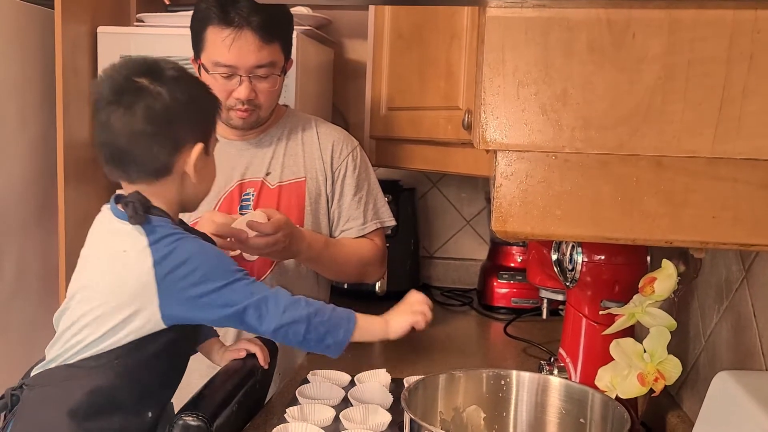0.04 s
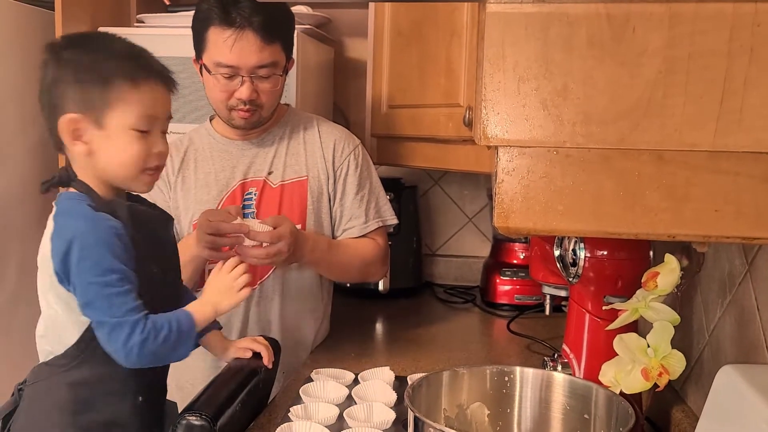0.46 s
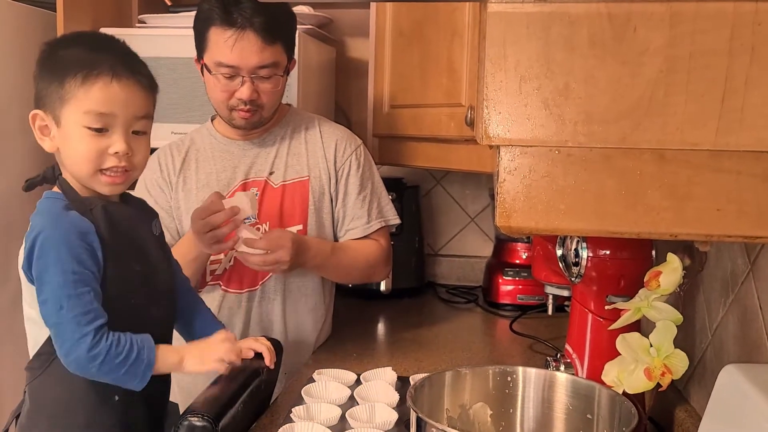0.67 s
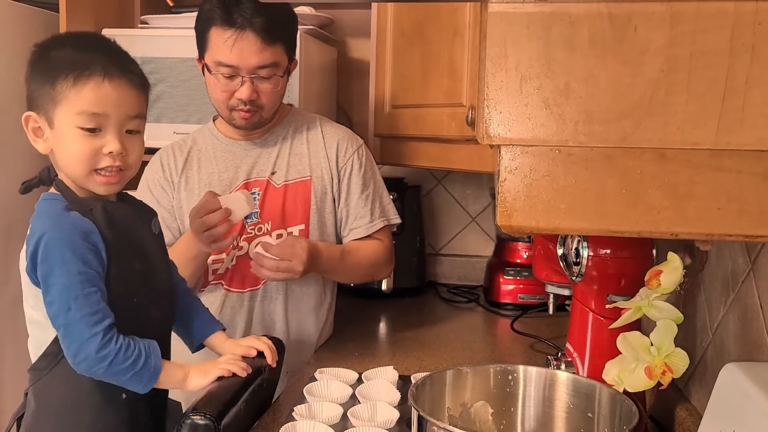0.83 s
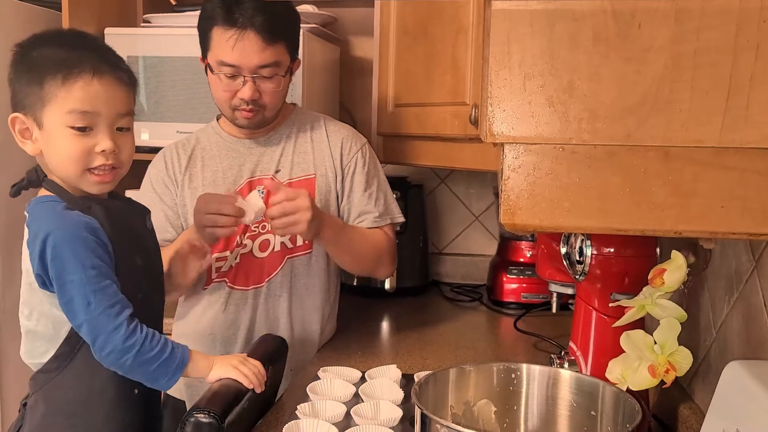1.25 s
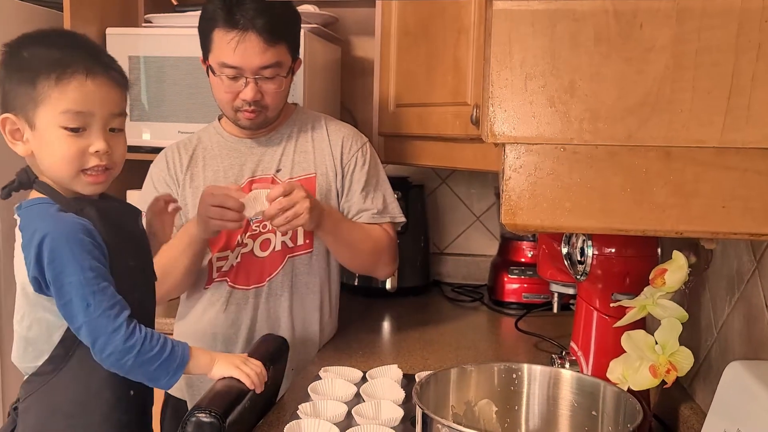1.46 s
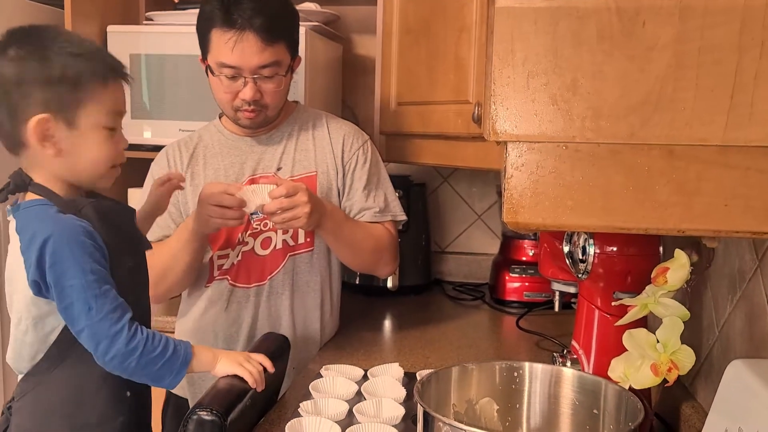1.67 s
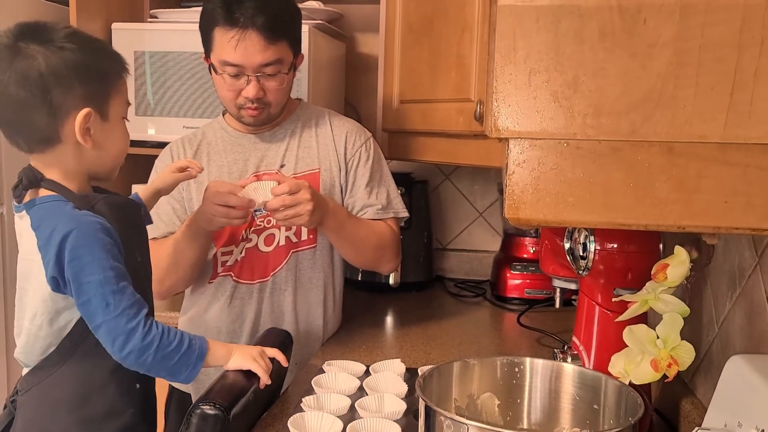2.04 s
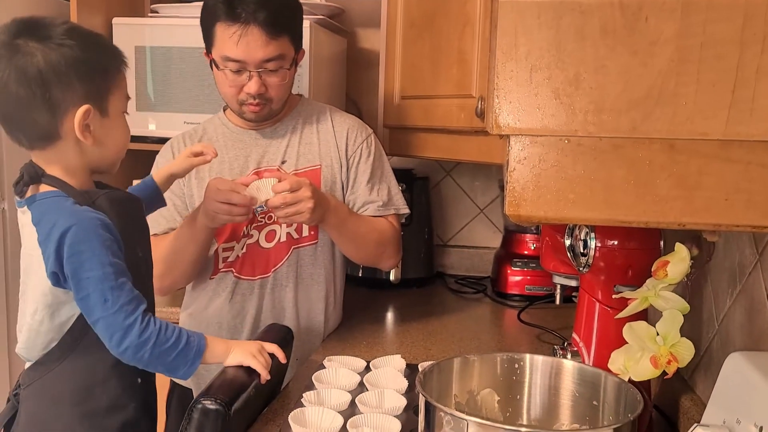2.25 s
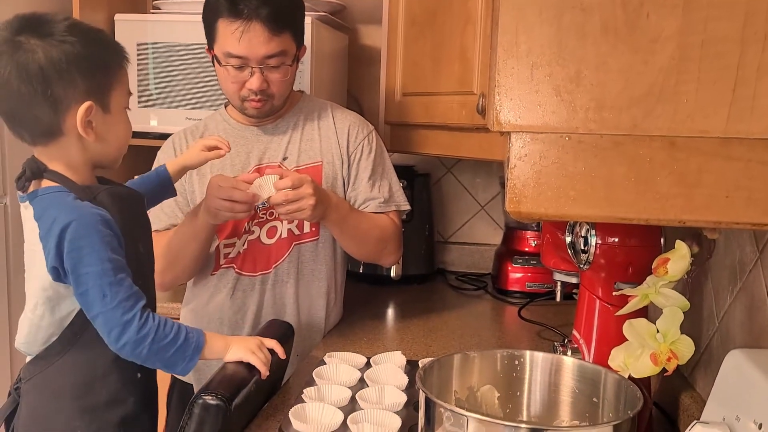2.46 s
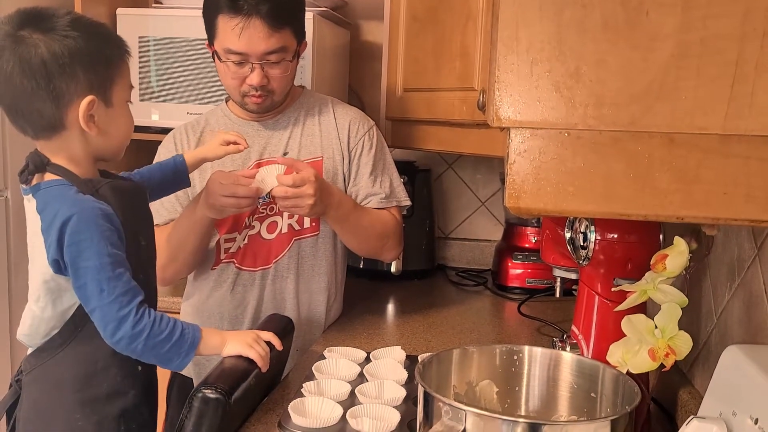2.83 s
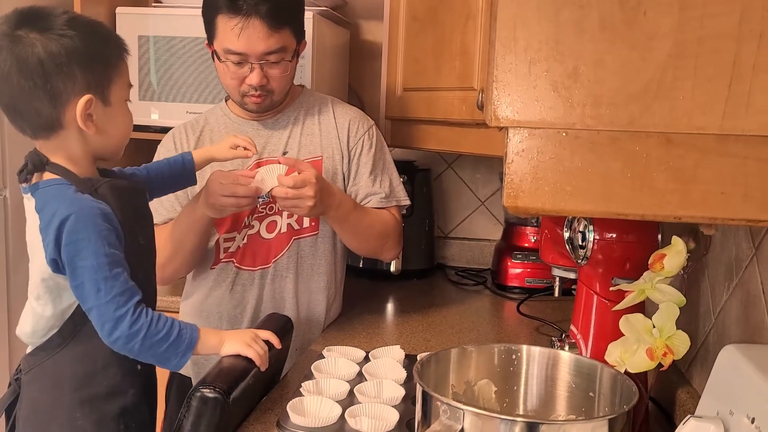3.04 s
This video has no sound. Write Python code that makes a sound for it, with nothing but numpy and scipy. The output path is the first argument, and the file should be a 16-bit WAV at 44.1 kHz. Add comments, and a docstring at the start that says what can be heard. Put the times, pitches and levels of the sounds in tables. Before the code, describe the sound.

Paper baking cups crackle as fingers pull one off the stack with a brief bright swish. More crinkling follows, fades to faint ticks and briefly returns. The microphone is close by in a small kitchen with a humming appliance.

```python
"""Thin paper baking cups are peeled apart by hand in a small kitchen, about a metre away.
Stick-slip friction between the pleats makes a dense stream of tiny clicks that shake the paper wall;
now and then a crease buckles and rings the cup. One cup slides off the stack with a bright swell,
and fingers bump and drag on the paper. Reflections from cupboards and walls smear these sounds,
while an appliance hums steadily over the low rumble of the room."""
import sys
import numpy as np
from scipy import signal
from scipy.fft import rfft, irfft
from scipy.io import wavfile
from scipy.ndimage import uniform_filter1d

SR = 44100
rng = np.random.default_rng(int(sys.argv[2]) if len(sys.argv) > 2 else 0)


def materialize(psi):
    """Save the field psi as 16-bit PCM at rate SR to the path in sys.argv[1].

    A 1-D psi becomes a single channel; in a 2-D psi each row is a channel.
    """
    bounded = np.clip(np.atleast_2d(psi).T, -1, 1)
    quanta = np.round(bounded * 32767).astype(np.int16)
    wavfile.write(sys.argv[1], SR, quanta)


N = 141120
TIME = np.arange(N) / SR


def undb(db):
    """Decibels to amplitude ratio."""
    return 10 ** (np.asarray(db) / 20)


def unit(x):
    """Normalisation to rms 1."""
    return x / np.sqrt(np.mean(x ** 2))


def pan(db):
    """Interaural level difference: two gains, the left db above the right."""
    return undb(np.array([[db], [-db]]) / 2)


def colour(x, spectrum):
    """Spectral shaping by (frequency [Hz], gain [dB]) points, at rms 1."""
    hz, db = np.array(spectrum, float).T
    f = np.maximum(np.fft.rfftfreq(x.shape[-1], 1 / SR), 1)
    gain = undb(np.interp(np.log(f), np.log(hz), db))
    return unit(irfft(rfft(x) * gain, x.shape[-1]))


def resonate(x, hz, width_hz):
    """Resonance: one peak, width_hz wide at 6 dB down, at rms 1."""
    f = np.fft.rfftfreq(x.shape[-1], 1 / SR)
    return unit(irfft(rfft(x) / (1 + (2 * (f - hz) / width_hz) ** 2), x.shape[-1]))


def drift(per_s):
    """Random modulation: twice-averaged noise, at rms 1."""
    span = max(int(SR / per_s), 1)
    smooth = uniform_filter1d(rng.standard_normal(N), span, mode="wrap")
    return unit(uniform_filter1d(smooth, span, mode="wrap"))


# Course of the friction: (time [s], relative hiss level [dB], relative wall level [dB])
FRICTION_LEVELS = [(0, -44.5, -51.5), (0.081, -38, -41), (0.15, -46, -49.5), (0.192, -44, -41.5),
                   (0.27, -46.5, -47), (0.33, -40, -43.5), (0.395, -49, -42), (0.435, -26, -27),
                   (0.47, -34, -39), (0.51, -28, -30.5), (0.54, -27, -43), (0.575, -33, -31),
                   (0.605, -34, -37), (0.635, -30.5, -37), (0.69, -48, -52.5), (0.755, -50.5, -55),
                   (0.8, -35, -46.5), (0.85, -56, -59), (0.911, -51, -61.5), (1.011, -44, -55.5),
                   (1.05, -53, -54.5), (1.11, -44.5, -55.5), (1.19, -54, -48.5), (1.245, -36.5, -52),
                   (1.29, -39.5, -43), (1.35, -33, -44.5), (1.43, -40.5, -44.5), (1.5, -45, -49),
                   (1.61, -46.5, -44.5), (1.68, -49.5, -54.5), (1.78, -48, -51), (1.83, -55, -55),
                   (1.89, -46, -49.5), (1.97, -51, -53.5), (2.03, -73, -65.5), (2.2, -62.5, -69),
                   (2.33, -58, -61), (2.395, -60, -50.5), (2.44, -79, -59), (2.54, -83, -67),
                   (2.6, -71, -77), (2.67, -55, -64), (2.72, -45, -53.5), (2.79, -56.5, -58),
                   (2.819, -32.5, -42.5), (2.875, -38, -52), (2.93, -56, -64), (3.02, -59, -69),
                   (3.06, -47.5, -57), (3.111, -60, -65), (3.2, -61, -66.5)]
# Spectrum of the pleats' hiss: (frequency [Hz], relative level [dB])
HISS_SPECTRUM = [(1500, -11.5), (3000, -50), (3900, -16.5), (4800, -4.5), (5600, 2.5), (6700, 5.5),
                 (7050, 1), (7350, 10), (7800, 6), (8600, -1.5), (10000, 1.5), (12400, 3.5), (14000, 3.5),
                 (16000, -6.5)]
def rubbing(hiss_gain_db=-7, wall_gain_db=-6.5):
    """Friction noise: slips hiss in the pleats and force the paper wall to vibrate."""
    when, hiss_db, wall_db = np.array(FRICTION_LEVELS, float).T
    clicks = slips()
    hiss = colour(clicks, HISS_SPECTRUM) * undb(np.interp(TIME, when, hiss_db) + hiss_gain_db)
    wall = cup_wall(clicks, TIME) * undb(np.interp(TIME, when, wall_db) + wall_gain_db)
    return hiss + wall


def slips(pleats=8, slips_per_s=4500, spread_db=2, jerk_depth_db=3.5):
    """Stick-slip motion: pleats catch and release in uneven clicks that swell in jerks."""
    jerk_db = jerk_depth_db * drift(per_s=41)
    out = np.zeros((2, N))
    for _ in range(pleats):
        released = rng.random(N) < slips_per_s / pleats / SR
        weaker_db = spread_db * np.minimum(rng.exponential(size=N), 2 * np.pi)
        out += scatter(released * undb(jerk_db - weaker_db) * rng.standard_normal(N))
    return out


def scatter(x, decay_s=0.00091, echo_db=8.5):
    """Scattering: pleats, fingers and counter spread each click, differently on each side."""
    t = np.arange(SR // 100) / SR
    echoes = rng.standard_normal((2, len(t))) * np.exp(-t / decay_s)
    echoes /= np.linalg.norm(echoes, axis=1, keepdims=True)
    return x + undb(echo_db) * signal.fftconvolve(x[None], echoes, axes=1)[:, :N]


# Wall response of the tight stack: (frequency [Hz], relative level [dB])
STACK_SPECTRUM = [(40, -30), (250, -14), (650, -17.5), (1040, -13), (1270, 2), (1430, 6.5), (1750, 0),
                  (1950, 4), (2250, -0.5), (2550, 2.5), (2900, 0.5), (3300, -0.5), (4000, -1.5),
                  (4800, -0.5), (7000, -24)]
# Wall response of a single cup: (frequency [Hz], relative level [dB])
CUP_SPECTRUM = [(40, -30), (250, -8), (650, -2.5), (880, -7), (1250, -1), (1600, 2), (1920, 2), (2240, 5.5),
                (2550, 3), (2950, 1), (3350, 1), (3800, -1), (7000, -8.5)]
def cup_wall(x, t, freed_s=1.27, crossfade_s=0.17):
    """Shell resonance: the wall colours a sound, first as a stack, later as one freed cup."""
    free = np.clip((t - freed_s) / crossfade_s, 0, 1)
    return (1 - free) * colour(x, STACK_SPECTRUM) + free * colour(x, CUP_SPECTRUM)


# Buckling creases, levels relative: (time [s], crack level [dB], ring level [dB], ring frequency [Hz],
# body level [dB], panel frequency [Hz], panel bandwidth [Hz], panel over knock [dB], left - right [dB])
CREASE_SNAPS = [(0.309, -52, -51, 7400, -45.5, 2170, 500, 5, -5),
                (0.404, -29, -26.5, 7200, -32, 1420, 298, -0.5, 2),
                (0.4066, -36, -36, 7140, -33.5, 2580, 380, 4, -4),
                (0.5205, -34, -45, 7250, -39, 1340, 400, -6, 1),
                (0.5795, -29, -25, 7340, -29.5, 1560, 500, -2, 0.5),
                (0.621, -42, -29.5, 7360, -37.5, 1580, 500, 4, -7),
                (0.807, -55, -59, 7400, -51, 1480, 450, 17, 0),
                (1.069, -38.5, -52, 7400, -46, 1300, 700, 4, 2.5),
                (1.156, -39, -37, 6970, -42, 1420, 415, 14, -1),
                (1.2033, -31.5, -22.5, 7300, -29.5, 2920, 1500, -0.5, -0.5),
                (1.2077, -41, -38, 7300, -35.5, 2530, 1100, 6, -3),
                (1.31, -44.5, -48, 7250, -54, 2300, 600, -10, -2),
                (1.362, -35, -38, 7200, -42, 2300, 500, -4, -5),
                (1.5378, -27.5, -20.5, 7470, -37.5, 2680, 700, -7, -1),
                (1.582, -37, -54, 7500, -44, 2280, 600, -6, 2),
                (1.608, -49, -54, 7500, -51, 2300, 500, 8, -2),
                (1.86, -54, -47, 7460, -81, 2230, 500, -6, -8.5),
                (2.0504, -52.5, -54, 7560, -73, 2230, 500, -9, -2),
                (2.3439, -49.5, -46, 7900, -62, 2250, 500, -11, -3),
                (2.3893, -75, -55, 7300, -53, 2810, 1500, 1, 0),
                (2.4753, -56.5, -47, 7250, -56.5, 2230, 900, -9, 1),
                (2.5133, -48, -60, 7400, -74, 2250, 500, -10, -1),
                (2.7105, -55, -45.5, 7300, -63, 2240, 500, 0, -11),
                (2.8044, -44.5, -38, 7300, -66, 2250, 500, -8, -6),
                (2.8291, -36, -34, 8360, -42.5, 3500, 900, -3, -2),
                (2.8367, -41, -30, 7400, -49.5, 3400, 900, -5, 1),
                (2.8567, -33, -50, 7000, -39, 2260, 550, -7, 2),
                (2.8728, -32, -43, 7000, -37.5, 2020, 1100, -4, 1),
                (3.053, -53, -53, 7260, -61, 1330, 350, 8, -1)]
# Spectrum of a crack: (frequency [Hz], relative level [dB])
CRACK_SPECTRUM = [(1500, -30.5), (3800, -13.5), (5000, 1), (6500, -0.5), (8800, -2), (10500, -1),
                  (12700, 4), (14500, -5), (16000, -3)]
def snapping(attack_s=0.00047, hold_s=0.0029, crack_gain_db=2.5, ring_gain_db=-3, body_gain_db=1.5):
    """Snap-through buckling: a crease cracks, rings and knocks the wall; one panel rings on."""
    spread, beamed = np.zeros((2, 2, N))
    t = np.arange(SR // 20) / SR

    def fade(decay_s):
        """Damping: exponential decay after a short rise and hold."""
        return np.minimum(t / attack_s, 1) * np.exp(-np.maximum(t - attack_s - hold_s, 0) / decay_s)

    for when, crack_db, ring_db, ring_hz, body_db, panel_hz, width_hz, panel_db, pan_db in CREASE_SNAPS:
        noise = rng.standard_normal((4, 2, len(t)))
        crack = colour(noise[0], CRACK_SPECTRUM) * fade(0.0038) * undb(crack_db + crack_gain_db)
        ring = resonate(noise[1], ring_hz, width_hz=1000) * fade(0.00094) * undb(ring_db + ring_gain_db)
        body = undb(body_db + body_gain_db) / np.hypot(1, undb(panel_db))  # shared by knock and panel
        knock = cup_wall(noise[2], when) * fade(0.0046) * body
        panel = resonate(noise[3], panel_hz, width_hz) * fade(0.0091) * undb(panel_db) * body
        start = int(when * SR)
        spread[:, start:start + len(t)] += ((crack + ring + knock) * pan(pan_db))[:, :N - start]
        beamed[:, start:start + len(t)] += (panel * pan(pan_db))[:, :N - start]
    return spread, beamed


# Spectrum of freely sliding pleats: (frequency [Hz], relative level [dB])
SLIDE_SPECTRUM = [(700, -30), (1030, -12.5), (1330, 2.5), (1650, -4.5), (2200, -9.5), (3800, -8.5),
                  (4800, 1.5), (5400, -1), (6200, 1), (7300, 3.5), (8800, -3), (12000, 0), (16000, -7)]
def sliding(start_s=0.484, end_s=0.585, rise_s=0.062, stop_s=0.0067, db=-30):
    """Sliding friction: a bright hiss swells with speed and stops as the cup leaves the stack."""
    speed = np.clip((TIME - start_s) / rise_s, 0, 1) * np.clip((end_s - TIME) / stop_s, 0, 1)
    return colour(rng.standard_normal((2, N)), SLIDE_SPECTRUM) * speed * undb(db)


# Finger knocks: (time [s], relative level [dB], frequency [Hz])
FINGER_BUMPS = [(0.5801, -39.5, 319), (.581, -40.5, 884), (0.621, -49.5, 363), (2.871, -64, 78)]
def bumping(decay_cycles=5.7):
    """Damped oscillation: soft knocks of the fingers as the paper gives way."""
    out = np.zeros(N)
    for when, db, hz in FINGER_BUMPS:
        cycles = np.maximum(TIME - when, 0) * hz
        envelope = np.minimum(cycles, 1) * np.exp(-cycles / decay_cycles)
        out += 2 * undb(db) * np.sin(2 * np.pi * cycles) * envelope
    return out


# Fingertip strokes on the freed cup: (centre time [s], duration [s], level [dB])
FINGER_DRAGS = [(1.36, 0.16, -51), (1.82, 0.25, -63.5), (2.296, 0.25, -70), (2.69, 0.16, -70)]
def dragging():
    """Friction-driven resonance: a fingertip makes the cup's main panel sing softly."""
    pressure = sum(undb(db) * np.cos(np.pi * np.clip((TIME - when) / length, -.5, .5))
                   for when, length, db in FINGER_DRAGS)
    return pressure * resonate(rng.standard_normal((2, N)), hz=2240, width_hz=180)


def kitchen(x, room_db, t60_s=0.44, treble_t60_s=0.33, early_db=-3, early_decay_s=0.0086):
    """Reverberation: near cupboards reflect first and loudest; the treble dies sooner."""
    t = np.arange(SR // 2) / SR
    noise = rng.standard_normal((2, len(t)))
    low = signal.sosfilt(signal.butter(2, 5000, fs=SR, output="sos"), noise)
    tail = low * undb(-60 * t / t60_s) + (noise - low) * undb(-60 * t / treble_t60_s)
    cupboards = 1 + undb(early_db) * np.exp(-t / early_decay_s)
    onset = np.clip(t / 0.00095 - 0.5, 0, 1)  # reflections begin after about 1 ms
    response = tail * cupboards * onset
    response /= np.linalg.norm(response, axis=1, keepdims=True)
    return x + undb(room_db) * signal.fftconvolve(x, response, axes=1)[:, :N]


# Appliance tones: (frequency [Hz], level [dB], left - right [dB], modulation depth [ratio])
MOTOR_TONES = [(118.6, -64, -4.5, 0.13), (140, -67.5, -1, 0.28), (236.35, -45.5, -1, 0.11),
               (298.5, -55.5, -8, 1), (330.4, -60.5, -11, 0.3), (429.7, -71.5, -21, 1),
               (531.3, -74, 14.5, 0.28), (615, -84.5, 31, 1)]
def hum(wavers_per_s=26.6):
    """Forced vibration: an appliance motor radiates tones, each wavering in level and phase."""
    out = np.zeros((2, N))
    for hz, db, pan_db, depth in MOTOR_TONES:
        waver = 1 + depth * (drift(wavers_per_s) + 1j * drift(wavers_per_s))
        tone = np.real(waver * np.exp(2j * np.pi * (hz * TIME + rng.random())))
        out += unit(tone) * undb(db) * pan(pan_db)
    return out


# Spectrum of the room's air noise: (frequency [Hz], relative level [dB])
RUMBLE_SPECTRUM = [(20, -40), (40, -26), (60, -10.5), (85, -21), (115, -5), (165, -12.5), (215, -8),
                   (270, -0.5), (310, -0.5), (380, -2.5), (470, -28), (650, -20), (900, -33), (1270, -32),
                   (1800, -48), (3600, -51), (7000, -33.5), (16000, -45)]
def rumble(db=-52, wide_above_hz=585):
    """Diffuse field: air noise is alike on both sides in the bass, uncorrelated higher up."""
    mid, side = rng.standard_normal((2, N))
    side = signal.sosfilt(signal.butter(1, wide_above_hz, "high", fs=SR, output="sos"), side)
    return colour(np.array([mid + side, mid - side]), RUMBLE_SPECTRUM) * undb(db)


def scene():
    """Superposition of paper and background; panels facing the listener excite the room less."""
    background = hum() + rumble()
    spread, beamed = snapping()
    paper = rubbing() + spread + bumping() + dragging() + sliding()
    return kitchen(paper, room_db=-1) + kitchen(beamed, room_db=-8) + background


def record(dry, cutoff_hz=15900):
    """Band limiting: a steep low-pass filter removes the highest treble."""
    return signal.sosfilt(signal.ellip(10, .2, 80, cutoff_hz, fs=SR, output="sos"), dry)


dry = scene()
out = record(dry)
materialize(out)
```